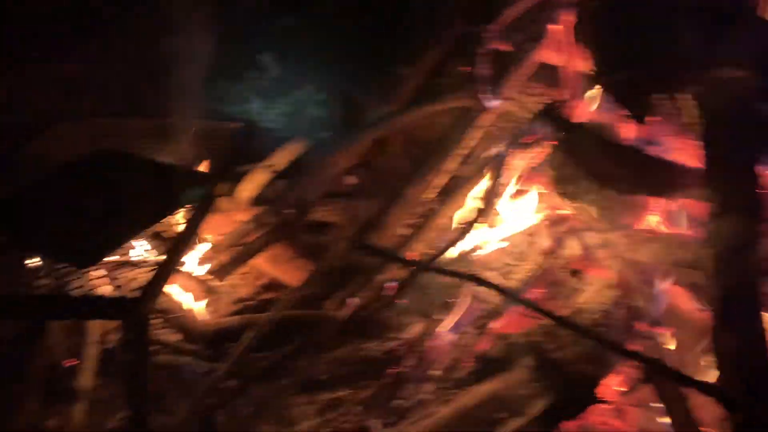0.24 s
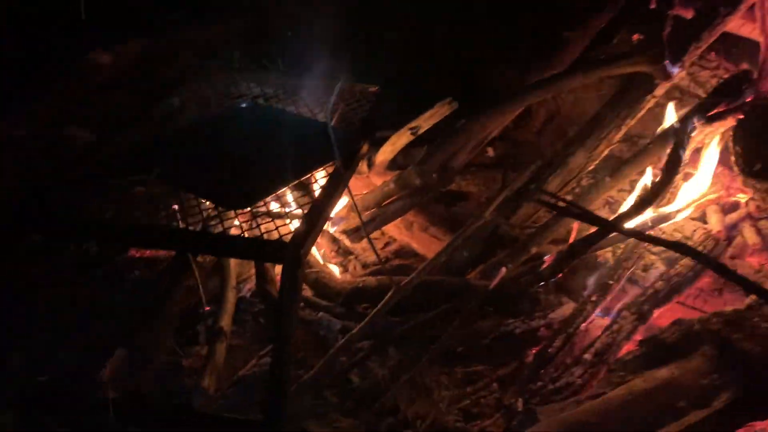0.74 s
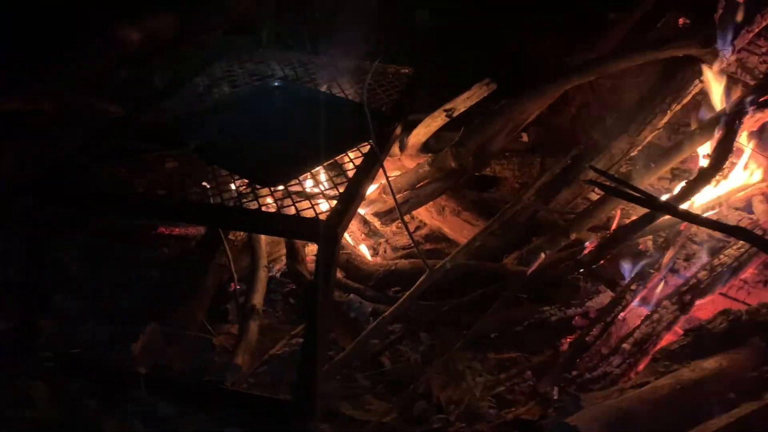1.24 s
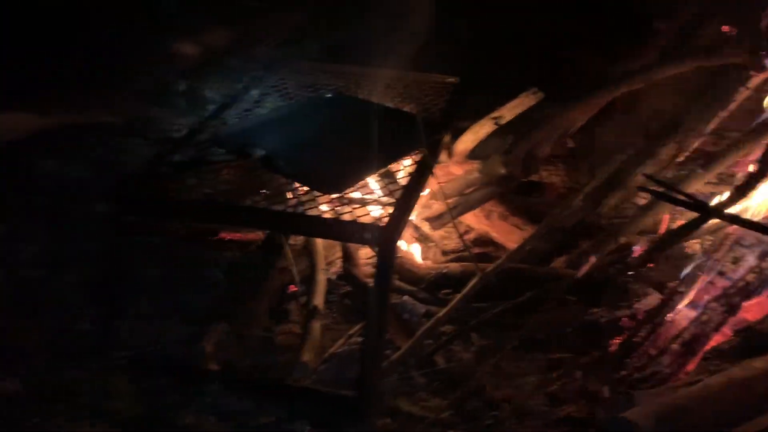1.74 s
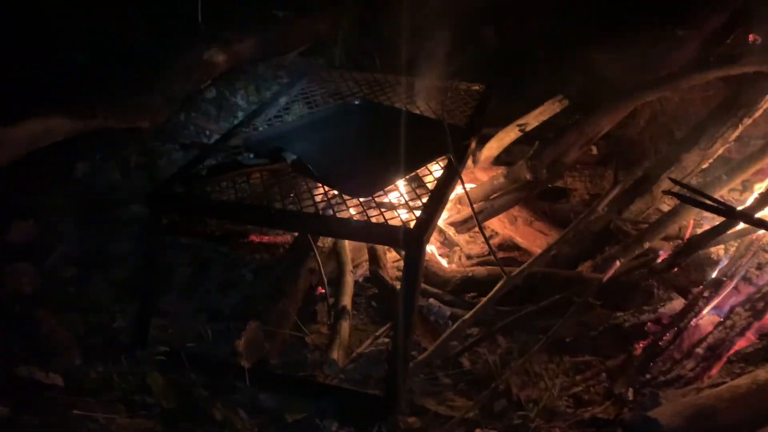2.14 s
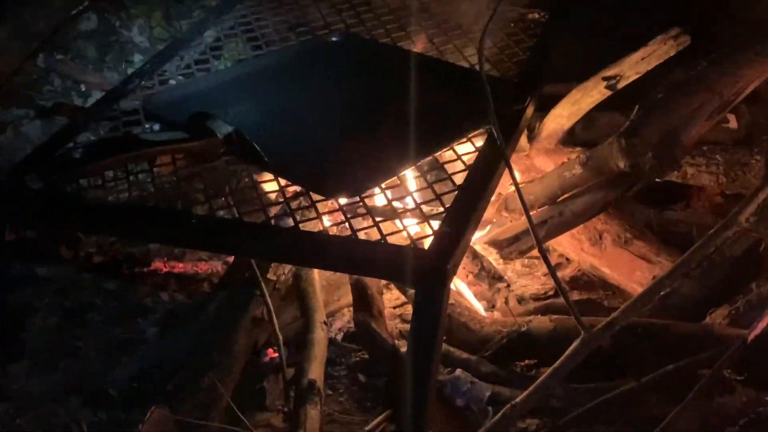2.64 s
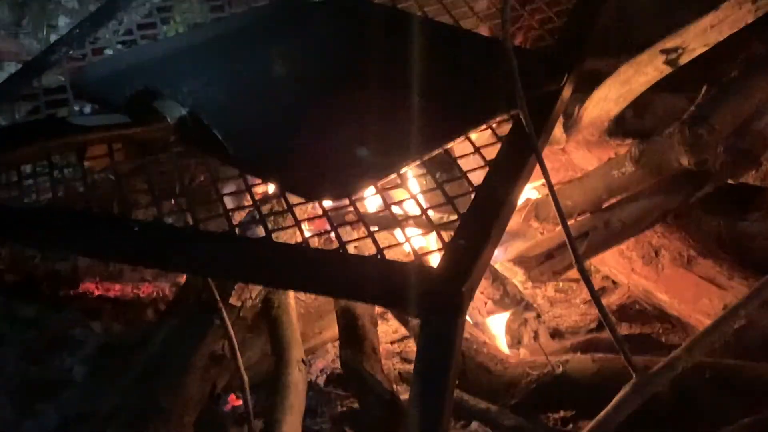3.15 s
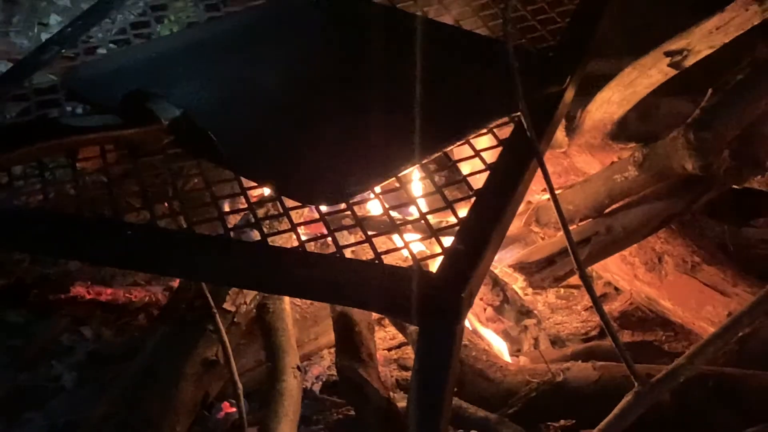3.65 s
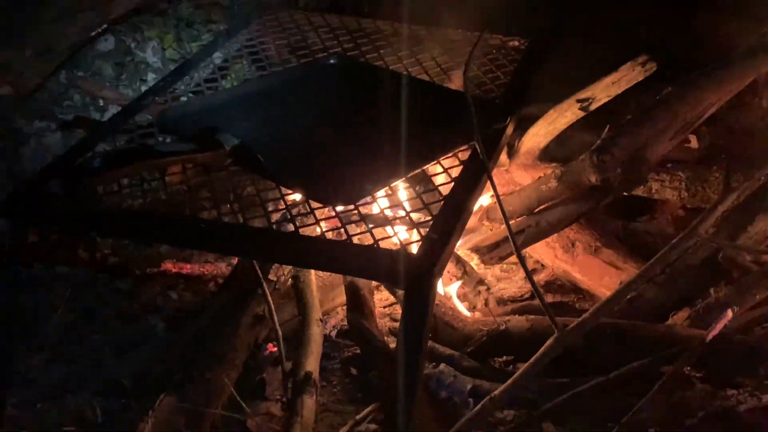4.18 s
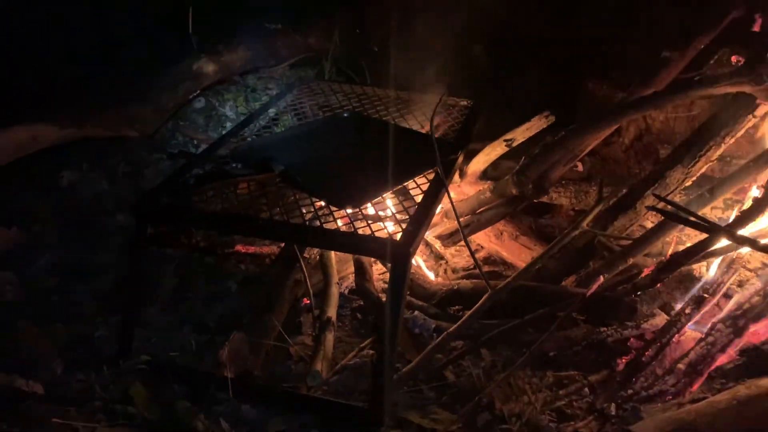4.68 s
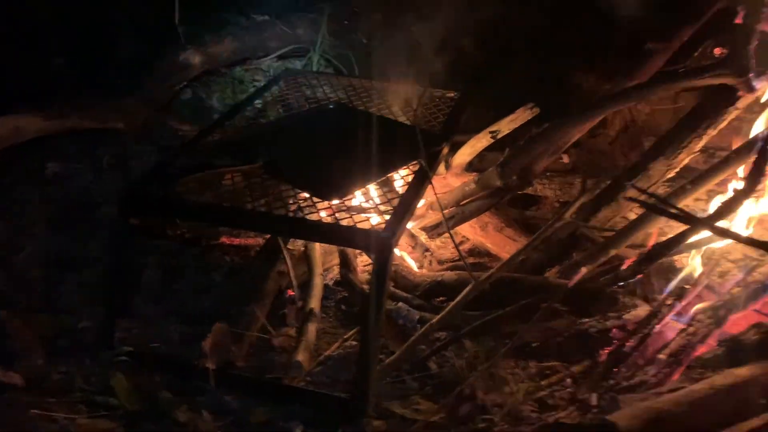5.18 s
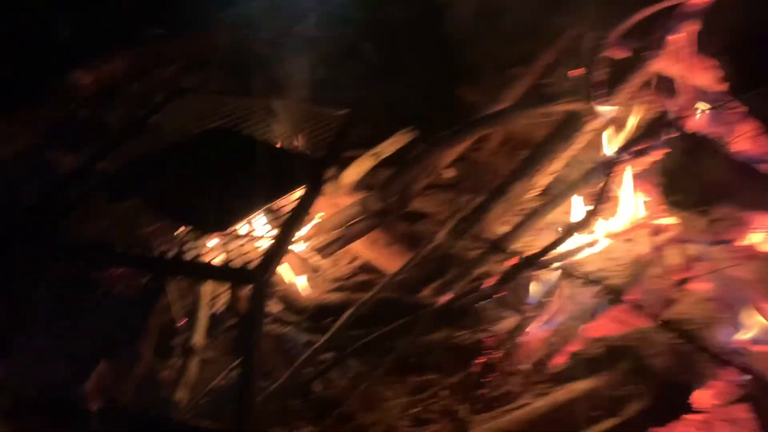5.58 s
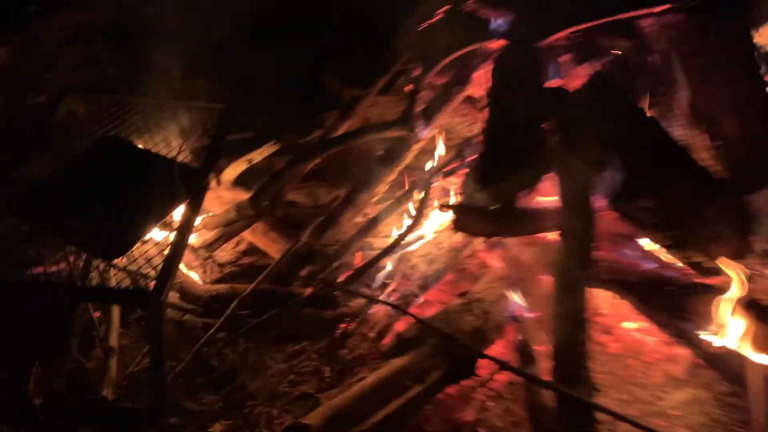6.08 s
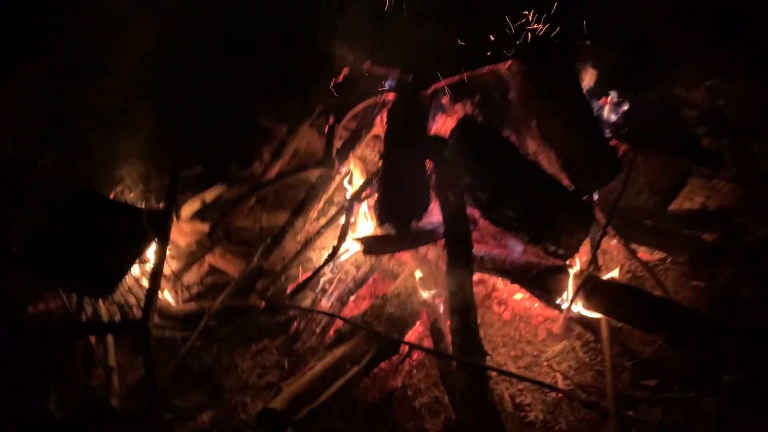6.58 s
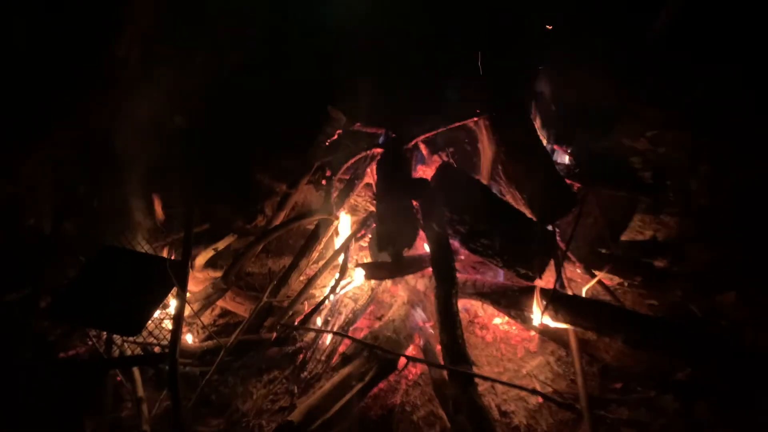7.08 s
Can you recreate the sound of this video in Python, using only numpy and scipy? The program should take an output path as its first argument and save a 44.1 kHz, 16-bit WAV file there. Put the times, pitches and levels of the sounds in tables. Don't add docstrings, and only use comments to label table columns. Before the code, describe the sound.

Close to a burning brush pile outdoors at night, bright dry snaps and tiny ticks come irregularly over a soft low flutter and faint roar. Logs knock dully now and then. Insects trill steadily around three kilohertz behind. Near six seconds a tight cluster of very loud cracks bursts out, followed by rustling twigs. Handheld stereo microphone, open air, no echo.

```python
import sys
import numpy as np
from scipy import signal
from scipy.fft import rfft, irfft
from scipy.io import wavfile
from scipy.ndimage import uniform_filter1d, minimum_filter1d

SR = 44100
rng = np.random.default_rng(int(sys.argv[2]) if len(sys.argv) > 2 else 0)


def gain_from_decibels(decibels):
    exponent = np.asarray(decibels, float) / 20
    return 10 ** exponent


def master_out(mix):
    frames = np.transpose(np.atleast_2d(mix))
    ceiling = np.clip(frames, -1, 1)
    pcm = np.round(ceiling * 32767).astype(np.int16)
    wavfile.write(sys.argv[1], SR, pcm)


N = 322923

# start [s], crack peak [dB], woody body re crack [dB],
# burst length [ms], favoured band [Hz].
POPS = [(0.169, -22, -3.5, 1, 6700), (0.496, -22.5, -11, 0.68, 11000), (0.8543, -19.5, -7, 0.6, 5270),
        (0.9384, -19.5, -22, 0.47, 11700), (1.32, -25, -9.5, 0.46, 9000), (2.1694, -13, -20, 0.37, 6900),
        (3.6173, -16, -17, 0.2, 14800), (3.7989, -14.5, -13.5, 1.47, 8900), (3.9953, -19, -9.5, .9, 7000),
        (5.0668, -26, -14, 0.75, 9000), (5.2893, -26, -13.5, 0.87, 9000), (5.6122, -21, -10, 0.86, 9800),
        (5.7113, -27, -8, 0.8, 6100), (5.7555, -11, -14.5, 0.67, 7000), (6.0274, -6.5, -46.5, 0.22, 9400),
        (6.1485, -7.5, -11.5, 0.3, 7140), (6.165, -20, -8, 1.5, 5850), (6.1824, -4.5, -7, 1.14, 5300),
        (6.2337, -21, -8, 0.73, 5100), (6.3085, -15.5, -6.5, 0.71, 4500), (7.038, -24, -4, 0.89, 6750),
        (7.0624, -27.5, -4, .85, 7300), (7.2285, -26, -18, .55, 10150), (7.2636, -26, 4.5, 0.48, 4020)]
# start [s], crack peak [dB], woody body re crack [dB], left minus right [dB].
SNAPS = [(0.0235, -38.5, 2, 0), (0.25, -25.5, -14, -7), (0.2807, -27.5, 3, -6), (0.825, -31, -21, -4),
         (0.9152, -27.5, -22, 4), (0.925, -28, -17, -4), (1.187, -27, -19, -5), (1.557, -25.5, -16, -4),
         (1.5962, -35, -16.5, -9), (1.974, -46.5, 11.5, 1), (2.0626, -34, 4, -18), (2.0925, -28.5, -6, -3),
         (2.147, -35, -5, -1), (2.1584, -29, -3.5, -14), (2.9396, -34.5, -1, -11), (3.0, -34, -20, 0),
         (3.5167, -34, -18, -9), (3.5523, -28, -14, -20), (3.6471, -24.5, -20, -2), (4.0417, -29.5, -20, 0),
         (4.143, -27.5, -31, -4), (4.5403, -29, -12, -12), (5.4464, -31, -4, -5), (5.6243, -25, -20, -2),
         (5.665, -25, -9, -9), (6.103, -30, -25, 3), (6.258, -32.5, -2, -1), (6.345, -26.5, -26, 2),
         (6.6548, -31, -9, -2), (6.7103, -37, 3, -4)]
# start [s], peak [dB].
TICKS = [(0.9607, -34), (1.0904, -38), (1.1604, -30), (1.353, -33), (1.5308, -42), (1.9061, -40),
         (2.056, -39), (2.365, -38), (2.535, -36), (2.6135, -37), (3.636, -33), (3.683, -36.5),
         (3.933, -43.5), (3.9463, -42), (4.1131, -39), (4.51, -39), (4.688, -39), (4.805, -39), (4.84, -46),
         (4.8609, -38), (4.995, -35.5), (5.1403, -27.5), (5.5572, -53), (5.5848, -46), (5.913, -47),
         (6.2864, -31.5), (6.763, -28.5)]
# frequency [Hz], density [dB per Hz].
CRACK_COLOUR = [(1400, -12.5), (2500, -12.5), (3600, 1), (5400, -11), (7000, -11.5), (9000, -9),
                (11000, -13.5), (13500, -8.5), (15500, -8.5), (16400, -27.5)]
# frequency [Hz], density [dB per Hz].
BODY_COLOUR = [(200, -64), (500, 15.5), (1000, 15), (1900, 17), (3000, 7.5), (5000, -77)]
POP_PAN_DB = -3.5
SNAP_MS, SNAP_HZ = 0.6, 9000
TICK_MS, TICK_HZ, TICK_BODY_DB, TICK_PAN_DB = 0.4, 11000, -13, -13

# start [s], peak [dB], pitch [Hz], ring t60 [s].
KNOCKS = [(0.861, -21, 486, 0.033), (0.866, -30.5, 1296, 0.04), (0.87, -25, 394, 0.019),
          (1.866, -32.5, 810, 0.032), (2.062, -31, 1390, 0.022), (2.937, -28.5, 475, 0.033),
          (3.516, -28.5, 280, 0.024), (3.996, -33, 407, 0.031), (3.551, -25.5, 278, 0.023),
          (3.8, -25.5, 297, 0.024), (5.71, -36.5, 1125, 0.05), (5.953, -37.5, 1296, 0.022),
          (6.184, -22.5, 275, 0.048), (6.186, -21, 1780, 0.02), (6.689, -47, 790, 0.025),
          (7.039, -42.5, 504, 0.026), (7.261, -27, 1132, 0.037), (7.265, -21.5, 306, 0.034),
          (7.279, -31, 1500, 0.033)]

# time [s], flutter level [dB].
FLUTTER_LEVEL = [(0, -39.5), (.7, -37), (2.2, -41.5), (3.6, -39), (4.9, -40.5), (5.5, -38.5), (6.2, -43),
                 (6.9, -41), (7.32, -42.5)]
# frequency [Hz], density [dB per Hz].
FLUTTER_COLOUR = [(20, -52), (32, -13), (50, 1), (75, 2), (120, -3.5), (200, -5), (300, -25.5),
                  (450, -27.5), (900, -51)]
# time [s], roar level [dB].
ROAR_LEVEL = [(0, -46), (1.1, -49), (2.95, -50), (3.3, -53), (4.3, -54), (5.3, -55), (5.55, -49.5),
              (5.9, -54.5), (6.8, -51), (7.32, -47)]
# frequency [Hz], density [dB per Hz].
ROAR_COLOUR = [(200, -8), (350, 3), (600, 4.5), (1000, 4.5), (1500, -4.5), (2200, -11.5), (3000, -5.5),
               (5000, -38)]
LUMPS_PER_S, FLUTTER_PAN_DB = 12, -1.4

# start [s], length [s], rustle level [dB], scrape level [dB].
SLIDES = [
    (-.05, 0.24, -68, -51.5),
    (5.414, 0.19, -60.5, -45.5),
    (6.143, 0.19, -47.5, -50.5),
    (6.906, 0.35, -48.5, -47),
    (7.21, 0.15, -44, -46.5),
]
# frequency [Hz], density [dB per Hz].
RUSTLE_COLOUR = [(800, -16), (1500, -1), (2500, 8), (4500, 8), (5500, 0.5), (7000, 4.5), (9000, 5),
                 (11000, 2), (13500, -7), (15600, -39), (16000, -45)]
# frequency [Hz], density [dB per Hz].
SCRAPE_COLOUR = [(200, -24), (350, -6), (900, -10), (1600, 1), (2100, -0.5), (2900, -11), (4500, -20.5)]
SLIDE_RISE_S, SLIDE_FALL_S = 0.075, 0.28

# start [s], length [s], level [dB], pitch [Hz].
PHRASES = [
    (0.295, 0.26, -40, 3200),
    (0.664, 0.19, -43.5, 3290),
    (1.2, 0.35, -41.5, 3340),
    (3.267, 0.55, -44.5, 3220),
    (3.851, 0.42, -46.5, 3340),
    (5.142, .4, -45, 3310),
    (5.955, .58, -40, 3210),
    (6.951, 0.11, -44, 3290),
]
PHRASE_RISE_S, PHRASE_FALL_S = 0.0492, 0.0807
# time [s], level [dB].
LOW_SINGER_LEVEL = [(0.9, -62), (1.6, -62), (2.13, -50.5), (2.73, -61.5), (4.76, -61.5), (5.4, -60.5),
                    (5.7, -76)]
# pitch [Hz], level [dB], pulse rate [per s], blur [Hz].
CHORUS = [(3124, -7, 33, 220), (3305, -6, 49, 81), (3424, -5, 13, 145), (3535, -7, 56, 110),
          (3890, -10.5, 8, 360), (4230, -11, 41, 480)]
CHORUS_DB = -45.5

# frequency [Hz], density [dB per Hz].
NIGHT_COLOUR = [(1400, -62), (1900, 10), (2400, -14), (2800, -13), (3900, -27), (4500, 5.5), (5300, -3.5),
                (6800, 0.5), (8500, -9.5), (11000, -5.5), (13500, 0.5), (15500, -2), (16400, -39)]
NIGHT_DB = -50.5

# frequency [Hz], difference re sum [dB].
SIDE_LEVEL = [(40, -1.5), (150, -10), (350, -4.5), (700, -2), (1500, 1), (3000, -0.5)]
# frequency [Hz], likeness [0-1].
PORTS_ALIKE = [(1500, .2), (4000, .5), (6500, .6), (8500, .98), (16000, .98)]
PORT_LAG_MS, PORT_TURNS = 0.213, 3.34
SHADOW_HZ = 7000
# frequency [Hz], level [dB per bin].
GATE = [(2000, -104), (2600, -93), (4000, -89), (5200, -99), (7000, -86), (8500, -81), (11000, -98),
        (13500, -76), (15800, -85), (16050, -72)]


def evened(x):
    return x / np.sqrt(np.mean(x ** 2) + 1e-20)


def read(points, hz):
    f, value = np.transpose(points)
    return np.interp(np.log(hz + 1), np.log(f + 1), value)


def column(rows, k):
    rows = np.array(rows)
    return np.interp(np.arange(N) / SR, rows[:, 0], rows[:, k])


def add(mix, s, sound):
    part = mix[:, max(round(s * SR), 0):][:, :sound.shape[1]]
    part += sound[:, :part.shape[1]]


def drift(rate_hz):
    t = np.arange(0, N + 64, 64) / SR
    slow = sum(np.sin(2 * np.pi * (f * t + rng.random())) / np.sqrt(f)
               for f in np.geomspace(rate_hz / 20, rate_hz, 20))
    return np.interp(np.arange(N) / SR, t, evened(slow))


def swell(start_s, length_s, rise_s, fall_s):
    t = np.arange(N) / SR - start_s
    return np.clip(t / rise_s, 0, 1) * np.exp(-np.maximum(t - length_s, 0) / fall_s)


def causal(colour, size=512):
    hz = abs(np.fft.fftfreq(4096, 1 / SR))
    log_gain = np.log(gain_from_decibels(np.maximum(read(colour, hz), -80)))
    taps = np.fft.ifft(np.exp(log_gain - 1j * signal.hilbert(log_gain).imag)).real[:size]
    return taps / np.linalg.norm(taps)


def port_phase(hz):
    return 2 * np.pi * (PORT_TURNS - hz * PORT_LAG_MS / 1000)


def grains(patchy_db):
    a, b, c, d, patches = rng.standard_normal((N // 256 + 5, 513, 5)).T
    patches = uniform_filter1d(patches, size=10, axis=0)
    patches = evened(uniform_filter1d(patches, size=10, axis=1))
    fields = np.array([a + 1j * b, c + 1j * d]) * gain_from_decibels(patchy_db * patches)
    return fields, np.fft.rfftfreq(1024, 1 / SR)[:, None]


def noise(colour, patchy_db):
    z, hz = grains(patchy_db)
    z = z * gain_from_decibels([read(colour, hz), read(colour, hz) + read(SIDE_LEVEL, hz)])
    m, s = signal.istft(z, nperseg=1024, noverlap=768)[1][:, :N]
    return np.array([m + s, m - s]) / np.sqrt(np.mean(m ** 2))


def hiss(colour, patchy_db):
    (right, other), hz = grains(patchy_db)
    alike = read(PORTS_ALIKE, hz)
    left = alike * right * np.exp(1j * port_phase(hz)) + np.sqrt(1 - alike ** 2) * other
    z = np.array([left, right]) * gain_from_decibels(read(colour, hz))
    return evened(signal.istft(z, nperseg=1024, noverlap=768)[1][:, :N])


def snap(crack, body, body_db, pan_db, ms, hz):
    t_ms = np.arange(2048) / SR * 1000 - 4
    after = np.maximum(t_ms, 0)
    lead_in = 0.07 * np.exp(np.minimum(t_ms, 0) / 1.2) * (t_ms < 0)
    split = (after / ms) ** 0.7 * np.exp(-(after / ms) ** 2)
    tail = 0.035 * (t_ms > 0) * np.exp(-after / 7.0)
    z = rfft(rng.standard_normal(2048) * (lead_in + split + tail))
    burst = irfft(z / uniform_filter1d(abs(z), size=70)) * abs(z).mean()

    clumps = 1.0 + rng.random((2, 64)).repeat(32, 1) ** 1.8
    decay = (1 - np.exp(-after / ms)) * 0.22 * np.exp(-after / (2.6 * ms))
    scatter = rng.standard_normal((2, 2048)) * clumps * decay

    f = np.fft.rfftfreq(2048, 1 / SR)
    alike = read(PORTS_ALIKE, f)
    other, shared = rfft(scatter)
    direct = rfft(burst)
    right = direct + shared
    left = direct * (1 - alike) + alike * right * np.exp(1j * port_phase(f))
    left = left + np.sqrt(1 - alike ** 2) * other

    tone = gain_from_decibels(18.0 * np.exp(-(np.log((f + 1) / hz) / 0.65) ** 2))
    shade = gain_from_decibels(np.outer([0.5, -0.5], pan_db / (1 + (f / SHADOW_HZ) ** 6)))
    bright = signal.fftconvolve(irfft(np.array([left, right]) * tone * shade), crack[None])
    woody = signal.fftconvolve(burst + 1.4 * scatter, body[None]) * shade[:, :1]
    return bright / abs(bright).max() + gain_from_decibels(body_db - 3.0) * woody / abs(woody).max()


def pops():
    out = np.zeros((2, N))
    crack, body = causal(CRACK_COLOUR), causal(BODY_COLOUR)
    rows = [(s, db, body_db, POP_PAN_DB, ms, hz) for s, db, body_db, ms, hz in POPS]
    rows += [(*row, SNAP_MS, SNAP_HZ) for row in SNAPS]
    rows += [(*row, TICK_BODY_DB, TICK_PAN_DB, TICK_MS, TICK_HZ) for row in TICKS]
    for s, db, *shape in rows:
        add(out, s - 0.004, gain_from_decibels(db + 9.0) * snap(crack, body, *shape))
    for when, size, tone, pan in rng.random((60, 4)):
        faint = snap(crack, body, body_db=12.0 * tone - 8.0, pan_db=8.0 * pan - 4.0, ms=0.6, hz=7000.0)
        add(out, when * N / SR, gain_from_decibels(-48.0 + 9.0 * size) * faint)
    return out


def knocks():
    out, t = np.zeros((2, N)), np.arange(3000) / SR
    puff_colour = causal(BODY_COLOUR)
    modes = [(0.55, 0.7), (1.01, 0.72), (1.6, 0.36)]
    attack = 1 - np.exp(-t / 0.00056)
    for s, db, hz, t60_s in KNOCKS:
        ring = sum(g * np.sin(2 * np.pi * hz * k * t) for k, g in modes)
        puff = signal.fftconvolve(rng.standard_normal((2, 3000)), puff_colour[None])[:, :3000]
        add(out, s, gain_from_decibels(db + 2.5 - 60 * t / t60_s) * (ring + 0.3 * puff) * attack)
    return out


def flames():
    pan_db = FLUTTER_PAN_DB * np.array([[0.5], [-0.5]])
    flutter = noise(FLUTTER_COLOUR, patchy_db=2.0)
    flutter = flutter * gain_from_decibels(column(FLUTTER_LEVEL, 1) + 1.1 * drift(LUMPS_PER_S) + pan_db)
    roar = noise(ROAR_COLOUR, patchy_db=2.1)
    roar = roar * gain_from_decibels(column(ROAR_LEVEL, 1) + 2.0 + 0.82 * drift(60))
    night = hiss(NIGHT_COLOUR, patchy_db=3.84) * gain_from_decibels(NIGHT_DB)
    return flutter + roar + night


def slides():
    rustle = hiss(RUSTLE_COLOUR, patchy_db=3.0)
    scrape = noise(SCRAPE_COLOUR, patchy_db=3.5)
    out = np.zeros((2, N))
    for s, length_s, rustle_db, scrape_db in SLIDES:
        moving = swell(s, length_s, SLIDE_RISE_S, SLIDE_FALL_S)
        out += moving * (rustle * gain_from_decibels(rustle_db + 9.5) + scrape * gain_from_decibels(scrape_db))
    return out * gain_from_decibels(1.6 * drift(150))


def trill(hz, per_s, blur_hz, depth):
    rate = SR / 4
    beat = np.cumsum(per_s * (1 + 0.0514 * drift(3.4)[::4])) / rate
    pulses = 1 + depth * np.cos(2 * np.pi * beat)
    blur = signal.butter(3, blur_hz / 2, fs=rate, output="sos")
    paths = signal.sosfilt(blur, rng.standard_normal((2, 2, len(beat))))
    carrier = np.exp(2j * np.pi * np.cumsum(hz + 0 * beat) / rate)
    return evened((pulses * (paths[0] + 1j * paths[1]) * carrier).real)


def singers():
    swells = np.array([gain_from_decibels(db) * swell(s, length_s, PHRASE_RISE_S, PHRASE_FALL_S)[::4]
                       for s, length_s, db, _ in PHRASES])
    pitch_hz = np.array(PHRASES)[swells.argmax(0), 3]
    near = swells.sum(0) * trill(pitch_hz, per_s=30.0, blur_hz=150.0, depth=0.45)
    far = sum(gain_from_decibels(db + 1.5 * drift(1.8)[::4]) * trill(hz, per_s, blur_hz, depth=0.25)
              for hz, db, per_s, blur_hz in CHORUS)
    low_level = gain_from_decibels(column(LOW_SINGER_LEVEL, 1)[::4] + 1.5)
    low = low_level * trill(1660.0, per_s=30.0, blur_hz=61.0, depth=0.43)
    return signal.resample_poly(near + gain_from_decibels(CHORUS_DB) * far + low, 4, 1, axis=1)[:, :N]


def scene():
    return flames() + slides() + pops() + knocks() + singers()


def starve(x, size=8):
    hz, _, z = signal.stft([x[0] + x[1], x[0] - x[1]], SR, nperseg=1024, noverlap=512)
    hz = hz[:-1, None]
    bins = abs(z[:, :-1] / 2) ** 2
    band = bins.reshape(2, -1, size, z.shape[2]).mean(2).repeat(size, 1)
    power = uniform_filter1d(band, size=3, axis=2)
    gate = gain_from_decibels(2 * read(GATE, hz))

    edge = np.diff(x[1], 2, append=[0, 0]) ** 2
    peak = -minimum_filter1d(-uniform_filter1d(edge, size=40), size=500)
    sharp = peak / uniform_filter1d(edge, size=2000)
    calm = sharp[np.minimum(np.arange(z.shape[2]) * 512, N - 1)] < 5

    masked = (power < gain_from_decibels(-2 * 7.5) * power[::-1]) & (hz > 7700) & calm
    thinned = (bins < 0.35 * band) & (power < 100 * gate) & (hz > 4500)
    faint = (power < gate) & calm
    z[:, :-1] *= ~(masked | thinned | faint) | (hz < 1500)
    m, s = signal.istft(z, nperseg=1024, noverlap=512)[1][:, :N] / 2
    return np.array([m + s, m - s])


def band_limit(x):
    return signal.sosfilt(signal.butter(12, 16470, fs=SR, output="sos"), x)


def record(dry):
    bass_cut = signal.butter(3, 38.0, "high", fs=SR, output="sos")
    mix = np.clip(signal.sosfilt(bass_cut, dry), -1, 1)
    return band_limit(starve(mix))


dry = scene()
out = record(dry)
master_out(out)
```